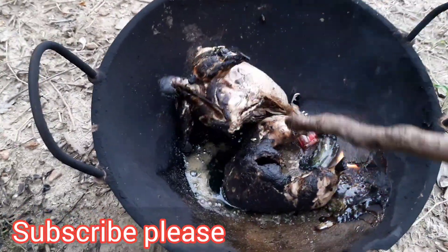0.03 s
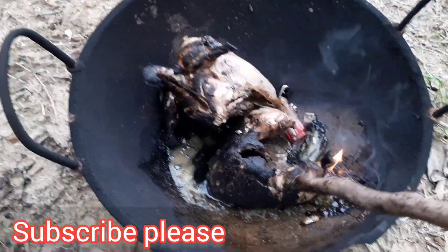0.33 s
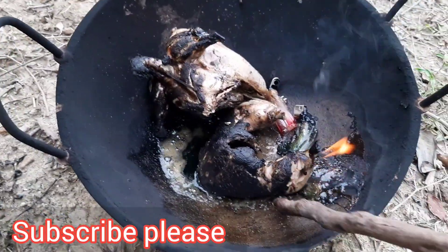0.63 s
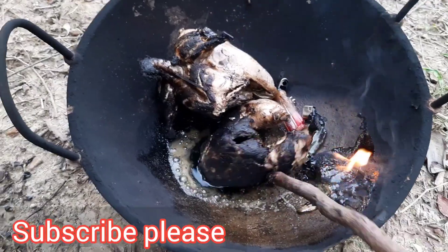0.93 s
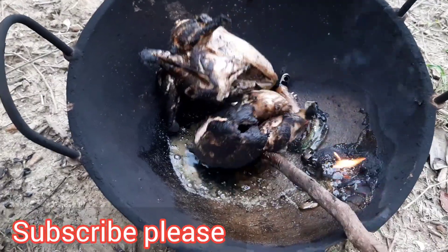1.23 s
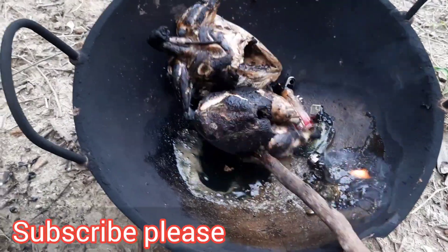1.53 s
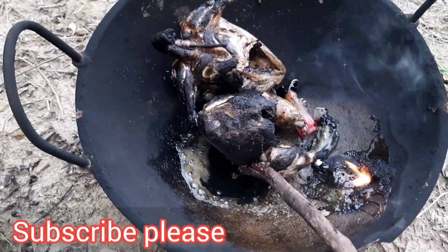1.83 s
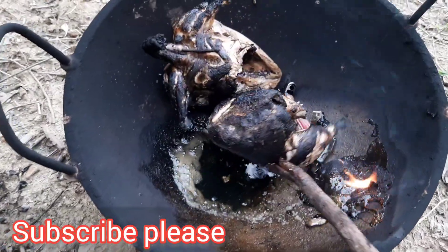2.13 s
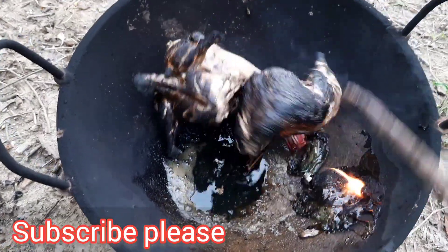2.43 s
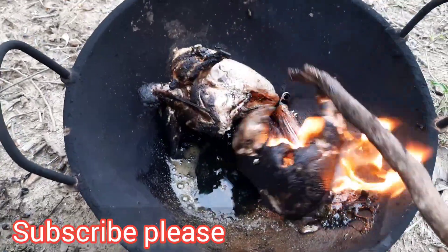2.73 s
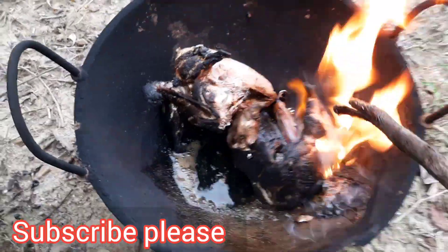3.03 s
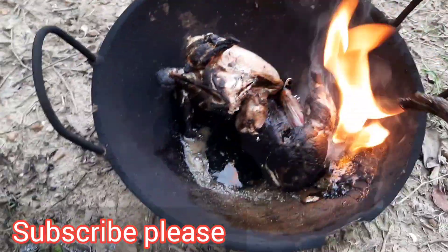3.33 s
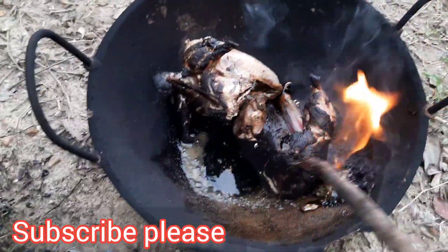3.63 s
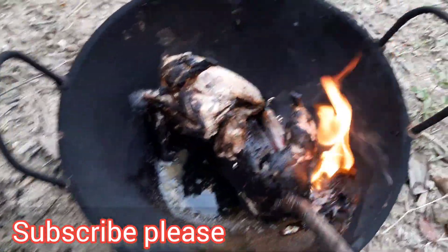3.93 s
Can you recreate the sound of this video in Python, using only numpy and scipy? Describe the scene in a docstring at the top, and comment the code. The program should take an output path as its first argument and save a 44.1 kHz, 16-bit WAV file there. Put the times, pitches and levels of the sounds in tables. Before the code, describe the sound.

Chicken sizzles lightly in an iron wok while a wooden stick scrapes and knocks, making the metal ring. Then juice hits burning fat in a loud crackling hiss that slowly settles. Close microphone, outdoors, with a low rumble underneath.

```python
"""Outdoors, a phone's two microphones close to an iron wok, the left one muffled. At first chicken
sizzles lightly in a little fat, a low open-air rumble underneath. From 0.6 s a wooden stick scrapes,
shoves and knocks the meat, and the iron rings. Near 2.7 s the meat tips into the burning fat: its juice
boils up in a loud crackling hiss, which slowly settles and grows finer as the juice runs out."""
import sys
import numpy as np
from scipy import signal
from scipy.fft import rfft, irfft
from scipy.io import wavfile
from scipy.ndimage import uniform_filter1d

SR = 44100
rng = np.random.default_rng(int(sys.argv[2]) if len(sys.argv) > 2 else 0)


def inscribe(sig):
    """Save sig as 16-bit PCM at rate SR to the path in sys.argv[1].

    A 1-D sig is mono; a 2-D sig holds one channel per row.
    Samples are clipped to [-1, 1] before scaling.
    """
    pcm = np.round(np.clip(np.atleast_2d(sig).T, -1, 1) * 32767)
    wavfile.write(sys.argv[1], SR, pcm.astype(np.int16))


N = 176400
T = np.arange(N) / SR

# Juice boiling off in the burning fat, and larger bubbles spluttering under the meat.
# Each row: time in seconds, level in dB.
FLARE_LEVEL = [(2.64, -65), (2.676, -21.5), (2.715, -16), (2.77, -21.5), (2.87, -21.5), (2.95, -19.5),
               (3.06, -22), (3.16, -24.5), (3.23, -24), (3.32, -30.5), (3.42, -31), (3.48, -30.5),
               (3.72, -28.5), (3.85, -31.5), (4, -32.5)]
SPLUTTER_LEVEL = [(2.66, -45), (2.70, -23.5), (2.76, -24.5), (2.83, -29.5), (3.0, -33.5), (3.24, -35.5),
                  (3.35, -38), (3.6, -43), (3.75, -42), (4, -42)]
# Spectra of the boil, its last fine bubbles and the splutter. Each row: frequency in Hz, relative dB.
FLARE_COLOUR = [(700, -16), (1000, -19), (1420, -8.5), (1630, -24), (1950, -6.5), (2420, -7.5),
                (3190, -2.5), (4010, -4), (5100, -1.5), (8400, 0), (9900, -6), (11000, -3.5), (13000, -5),
                (15800, -7.5)]
FINE_COLOUR = [(700, -18), (1000, -16), (1420, -12), (1700, -19), (2500, -10), (3200, -6), (4400, -7),
               (5600, -2.5), (8400, 1.5), (9900, -5), (11000, -0.5), (13000, -4.5), (15800, -7.5)]
SPLUTTER_COLOUR = [(80, -14.5), (180, -4.5), (330, -0.5), (420, -3), (570, 4), (780, -3.5), (1000, -6.5),
                   (1400, -1.5), (1650, -5), (1950, -1.5), (2500, -20.5), (5000, -33)]
FINE_FROM_S, FINE_TO_S = 3.48, 3.54


def flare():
    """Wet meat boils in burning fat, close up; the bubbles get finer as the juice runs out."""
    fat = frying(per_s=4500, spread_db=3, steam_db=-5, flicker_db=0.5,
                 crackles_per_s=270, crackle_db=-7.5, crackle_s=0.00041)
    fine = np.clip((T - FINE_FROM_S) / (FINE_TO_S - FINE_FROM_S), 0, 1)
    sizzle = (1 - fine) * colour(fat, FLARE_COLOUR) + fine * colour(fat, FINE_COLOUR)
    bubbles = clicks(per_s=900, spread_db=1) * curve(SPLUTTER_LEVEL)
    return sizzle * curve(FLARE_LEVEL) + colour(bubbles, SPLUTTER_COLOUR)


def frying(per_s, spread_db, steam_db, flicker_db, crackles_per_s, crackle_db, crackle_s):
    """Tiny bubbles burst singly and in short crackles over a smooth hiss of steam."""
    onsets = np.abs(clicks(crackles_per_s, spread_db))
    tails = signal.lfilter([1], [1, -np.exp(-1 / (crackle_s * SR))], onsets)
    crackle = undb(crackle_db) * unit(tails * rng.standard_normal(N))
    bubbles = clicks(per_s, spread_db)
    steam = undb(steam_db) * rng.standard_normal(N)
    return unit((bubbles + crackle + steam) * undb(flicker_db * wander(hz=29.605)))


# Sharp spits of fat. Each row: start in seconds, relative level in dB, decay in seconds.
SPITS = [(.0648, -31.5, 0.00081), (.115, -33, 0.00053), (.1625, -33.5, 0.0021), (.219, -34.5, .0015),
         (0.2916, -31.5, .001), (0.3495, -34.5, .0012), (0.5588, -34.5, 0.0021), (0.6554, -33, 0.0016),
         (.8225, -28, 0.00092), (0.8617, -32.5, .002), (.923, -39, 0.0015), (1.2487, -41, .001),
         (1.3623, -27, 0.003), (1.3704, -25, 0.00031), (1.644, -31, .001), (1.802, -34, 0.00074),
         (2.28, -31.5, 0.00061), (2.3417, -34.5, 0.00042), (2.4305, -32.5, 0.0019), (2.6615, -33.5, 0.0046),
         (2.7308, -23, 0.0012), (2.876, -17, .001), (2.919, -24, .0006), (2.9281, -20, .001),
         (3.2352, -20.5, 0.0037), (3.4699, -27.5, 0.0022), (3.6034, -25, 0.0012), (3.7277, -24.5, 0.0022),
         (3.8915, -23.5, 0.0015)]
# Their spectrum. Each row: frequency in Hz, relative dB.
SPIT_COLOUR = [(500, -18), (1500, -7), (4000, -6), (8300, -0.5), (10000, -5.5), (15500, -7)]
# Dull pops. Each row: start in seconds, relative level in dB.
POPS = [(0.605, -36), (0.86, -28.5), (1.164, -31), (2.426, -36), (2.757, -18), (2.791, -27), (2.818, -26.5),
        (3.046, -28), (3.234, -27), (3.292, -31.5), (3.385, -26.5), (3.439, -26), (3.545, -32)]


def spatter():
    """Fat spits and big bubbles pop, each a single puff of noise near the microphones."""
    spits = sum(undb(db) * burst(start, decay_s) for start, db, decay_s in SPITS)
    pops = sum(undb(db) * burst(start, decay_s=0.0042) for start, db in POPS)
    return undb(7.5) * colour(spits, SPIT_COLOUR) + undb(2.0) * colour(pops, SPLUTTER_COLOUR)


# Gentle frying, and a narrow fizz as the meat is pushed. Each row: time in seconds, level in dB.
SIMMER_LEVEL = [(0, -40), (.35, -40.5), (.62, -42), (.8, -37.5), (.92, -41), (1.22, -40.5), (1.42, -41),
                (1.54, -37.5), (1.72, -46.5), (1.85, -41), (2.3, -45), (2.64, -42.5), (4, -57)]
FIZZ_LEVEL = [(1.45, -70), (1.56, -47), (2.0, -45), (2.3, -48), (2.6, -56)]
# Their spectra. Each row: frequency in Hz, relative dB.
SIMMER_COLOUR = [(400, 9), (700, -37), (1040, -6), (1430, -12.5), (2070, 0.5), (2600, -1.5), (3530, 2.5),
                 (4300, 0), (8500, 2), (9760, -4.5), (11300, -2), (13000, -4), (15800, -6)]
FIZZ_COLOUR = [(1000, -23), (1800, -7), (2300, -1), (2800, -9), (4000, -23)]
# The meat is pressed. Each row: start in seconds, length in seconds, level in dB.
SQUEEZES = [(0.694, 0.175, -50), (1.464, 0.305, -41.5)]


def simmer():
    """Light frying in the wok; pressed meat sheds juice that hisses on the iron, sliding meat fizzes."""
    fat = frying(per_s=1500, spread_db=4, steam_db=4.5, flicker_db=0.98,
                 crackles_per_s=100, crackle_db=-2, crackle_s=0.0014)
    juice = clicks(per_s=6000, spread_db=2.3) * strokes(SQUEEZES)
    fizz = colour(clicks(per_s=3000, spread_db=1.4), FIZZ_COLOUR) * curve(FIZZ_LEVEL)
    return colour(fat, SIMMER_COLOUR) * curve(SIMMER_LEVEL) + colour(juice, FINE_COLOUR) + fizz


# The stick knocks the wok and the meat drops back.
# Each row: start in seconds, level in dB, low-pass cutoff in Hz, decay of the clack in seconds.
KNOCKS = [(1.028, -20, 1280, 0.0083), (1.5073, -18.5, 14000, 0.0041), (2.0025, -34.5, 4040, .001),
          (2.755, -27, 1100, .008)]
# Spectra of the crack, the wooden stick and the thud. Each row: frequency in Hz, relative dB.
CRACK_COLOUR = [(1500, -16), (3000, -3), (3400, -11), (3900, 9), (4400, 1), (5200, -5), (8000, -6),
                (15000, -10)]
WOOD_COLOUR = [(100, -6.5), (330, -2), (500, -1), (680, -6), (900, -2.5), (1200, -4), (1500, 0),
               (2600, -17), (3400, -15), (3950, 2), (4700, -10), (6000, -6), (8000, -10), (15000, -20)]
THUD_COLOUR = [(150, -20), (320, 1), (400, -9), (490, 12), (650, -18), (850, -6), (1200, -9), (3000, -50)]


def knocks():
    """Wood strikes iron at close range: a crack, a clack and a thud, then the wok rings on."""
    out = 0
    for start, db, cutoff_hz, decay_s in KNOCKS:
        crack = undb(-1) * colour(burst(start, decay_s=0.004), CRACK_COLOUR)
        clack = colour(burst(start, decay_s), WOOD_COLOUR)
        thud = undb(-8.5) * colour(burst(start, decay_s=0.012), THUD_COLOUR)
        ring = undb(-6.5) * wok_ring(signal.unit_impulse(N, int(start * SR)))
        out = out + undb(db) * soften(crack + clack + thud + ring, cutoff_hz)
    return out


# The stick drags meat over the iron.
# Each row: start in seconds, length in seconds, relative level in dB, low-pass cutoff in Hz.
SCRAPES = [(0.637, .13, -38.5, 1090), (0.747, 0.15, -36.5, 940), (1.063, .22, -38.5, 1430),
           (1.106, 0.1, -39, 2000), (1.374, 0.18, -36.5, 1400), (1.552, 0.214, -39, 1800),
           (1.77, .15, -50.5, 1200), (1.904, 0.12, -42, 2410), (2.474, .18, -41, 790)]
# Crisp skin under the stick. Each row: start in seconds, length in seconds, level in dB.
RASPS = [(0.697, 0.26, -44), (1.085, 0.2, -42.5), (1.598, 0.17, -43.5), (2.55, 0.084, -42.5),
         (3.722, 0.064, -35)]
# The skin's spectrum. Each row: frequency in Hz, relative dB.
RASP_COLOUR = [(500, -25), (1500, 1.5), (2400, 0), (3800, 3), (5500, -0.5), (8000, -10), (15000, -52)]


def scrapes():
    """Stick-slip clicks sound in the wood and set the wok ringing; the crisp skin rasps."""
    slips = clicks(per_s=2000, spread_db=2.5) * undb(1.6 * wander(hz=40.7))
    push = sum(undb(db) * soften(slips * stroke(start, length), cutoff_hz)
               for start, length, db, cutoff_hz in SCRAPES)
    rasp = clicks(per_s=2000, spread_db=2.2) * undb(2 * wander(hz=45)) * strokes(RASPS)
    ring = wok_ring(push) / np.linalg.norm(wok_ring(signal.unit_impulse(N)))
    return colour(push, WOOD_COLOUR) + undb(-5.5) * ring + colour(rasp, RASP_COLOUR)


# The wok's modes. Each row: frequency in Hz, relative level in dB, seconds to fall by 60 dB.
WOK_MODES = [(308, -14.5, 0.35), (472, -5, 0.19), (568, -6, 0.18), (812, -0.5, 0.27), (908, -5, 0.17),
             (960, -13, 0.36), (1065, -6, 0.1), (1243, -8, 0.21), (1574, -13, 0.14), (1860, -3, 0.12),
             (2050, 2, 0.038), (2314, -4, .08), (3130, -6, 0.12), (3550, 3, 0.029)]


def wok_ring(push):
    """A push on the iron sets its modes ringing as decaying sines."""
    t = T[:SR // 2]
    ring = sum(undb(db) * np.sin(2 * np.pi * hz * t) * np.exp(-np.log(1000) * t / t60)
               for hz, db, t60 in WOK_MODES)
    return signal.fftconvolve(push, ring)[:N]


ECHO_DB, ECHO_DECAY_S = -15, 0.0055


def wok_reflections(direct):
    """Direct sound plus quick reflections inside the wok, different at each microphone."""
    t = T[:SR // 30]
    echoes = rng.standard_normal(len(t)) * np.exp(-t / ECHO_DECAY_S) * (t > 0.001)
    echoes = signal.sosfilt(signal.butter(1, 700, "high", fs=SR, output="sos"), echoes)
    reflected = signal.fftconvolve(direct, echoes / np.linalg.norm(echoes))[:N]
    gain = undb(ECHO_DB)
    return (direct + gain * reflected) / np.hypot(1, gain)


# The open air around the wok. Each row: time in seconds, level in dB.
RUMBLE_LEVEL = [(0, -41.5), (.65, -39.5), (1.4, -41), (1.72, -38), (2.05, -40.5), (2.25, -43), (2.6, -40.5),
                (2.8, -39), (3.1, -41), (3.5, -42.5), (4, -44.5)]
# The flame flutters. Each row: start in seconds, length in seconds, level in dB.
FLUTTERS = [(1.755, 0.205, -37.5), (2.662, 0.33, -38.5)]
# Spectra of air and flame. Each row: frequency in Hz, relative dB.
RUMBLE_COLOUR = [(20, -24), (34, -21), (52, -8), (95, 0), (150, -8), (250, -13), (400, -24.5), (750, -29.5),
                 (1500, -21.5), (4000, -57)]
FLUTTER_COLOUR = [(50, -15), (85, 7.5), (150, -4), (280, -7.5), (420, -20.5), (1000, -39), (3000, -74)]


def rumble():
    """Behind the cooking, the low, uneven noise of the open air and two flutters of the flame."""
    air = colour(rng.standard_normal(N), RUMBLE_COLOUR) * curve(RUMBLE_LEVEL) * undb(1.8 * wander(hz=12))
    flame = colour(rng.standard_normal(N), FLUTTER_COLOUR) * strokes(FLUTTERS)
    return air + flame


def undb(db):
    """Decibels to gain."""
    return 10 ** (np.asarray(db) / 20)


def unit(x):
    """Scale to a standard deviation of 1."""
    return x / (np.std(x) + 1e-12)


def curve(rows):
    """Gain over time from (s, dB) points, silent before the first."""
    return undb(np.interp(T, *np.array(rows).T, left=-120))


def stroke(start, length, edge_s=0.025):
    """Envelope that swells, holds and fades."""
    return np.clip(np.minimum(T - start, start + length - T) / edge_s, 0, 1)


def strokes(rows):
    """Gain over time with one stroke for each (start s, length s, dB) row."""
    return sum(undb(db) * stroke(start, length) for start, length, db in rows)


def response(points, hz):
    """Gain at given frequencies from (Hz, dB) points, falling away below the first."""
    point_hz, db = np.array(points, float).T
    roll_off = np.minimum(1, (hz + 1) / point_hz[0]) ** 2
    return undb(np.interp(np.log(hz + 1), np.log(point_hz), db)) * roll_off


def colour(x, points, size=4096):
    """Causal filter through (Hz, dB) points that keeps the power of white noise."""
    gain = response(points, np.fft.rfftfreq(size, 1 / SR))
    cepstrum = irfft(np.log(gain + 1e-4))
    cepstrum[1:size // 2] *= 2  # fold onto positive time for minimum phase
    cepstrum[size // 2 + 1:] = 0
    impulse = irfft(np.exp(rfft(cepstrum)))
    return signal.oaconvolve(x, impulse / np.linalg.norm(impulse))[:N]


def soften(x, cutoff_hz):
    """Low-pass of a soft contact."""
    return signal.sosfilt(signal.butter(3, min(cutoff_hz, SR / 3), fs=SR, output="sos"), x)


def clicks(per_s, spread_db):
    """Random clicks, many small and a few large."""
    size = undb(spread_db * np.minimum(rng.exponential(size=N), 5.3))
    return unit((rng.random(N) < per_s / SR) * size * rng.choice([-1, 1], N))


def burst(start, decay_s):
    """A puff of noise that starts at once and dies away."""
    out, at = np.zeros(N + SR), int(start * SR)
    t = T[:SR // 8]
    out[at:at + len(t)] = np.exp(-t / max(decay_s, 1e-4)) * rng.standard_normal(len(t))
    return out[:N]


def wander(hz):
    """Random drift with a spread of 1, gliding to a new value hz times a second."""
    hold = max(int(SR / hz), 2)
    steps = np.repeat(rng.standard_normal(N // hold + 1), hold)[:N]
    return unit(uniform_filter1d(steps, hold))


# The muffled left microphone. Each row: frequency in Hz, level against the right one in dB.
LEFT_MUFFLE = [(60, -2), (200, -3), (400, -5.5), (750, -2.6), (1100, -7.5), (1550, -6), (2300, -19),
               (3200, -22), (4800, -20), (6200, -31.5), (7200, -44), (8300, -47), (9800, -43),
               (12000, -28.5), (15500, -24)]
LEFT_LAG_S, LEFT_DIFFUSE_GAIN, RUMBLE_SIDE_GAIN = 0.00022, 0.8, 0.225


def scene():
    """Two microphones close to the wok; the left is late, muffled and hears the sizzle partly diffuse."""
    sizzle = simmer() + flare()
    stick = knocks() + scrapes()
    spits = spatter()
    diffuse = simmer() + flare()  # fresh random bubbles, heard on the left only
    left_sizzle = np.sqrt(1 - LEFT_DIFFUSE_GAIN ** 2) * sizzle + LEFT_DIFFUSE_GAIN * diffuse
    air_mid, air_side = rumble(), RUMBLE_SIDE_GAIN * rumble()
    hz = np.fft.rfftfreq(N, 1 / SR)
    muffle = response(LEFT_MUFFLE, np.maximum(hz, LEFT_MUFFLE[0][0]))
    lag = np.exp(-2j * np.pi * hz * LEFT_LAG_S)
    left = rfft(wok_reflections(left_sizzle + spits + stick) + air_mid + air_side) * lag * muffle
    right = rfft(wok_reflections(sizzle + spits + stick) + air_mid - air_side)
    return irfft(np.array([left, right]) * 2 / (1 + muffle), N)  # the two gains average to 1


def record(dry):
    """The phone clips any peak over full scale and cuts the treble above 16 kHz."""
    low_pass = signal.ellip(10, 0.2, 70, 16000, fs=SR, output="sos")
    return signal.sosfilt(low_pass, np.clip(dry, -1, 1))


dry = scene()
out = record(dry)
inscribe(out)
```